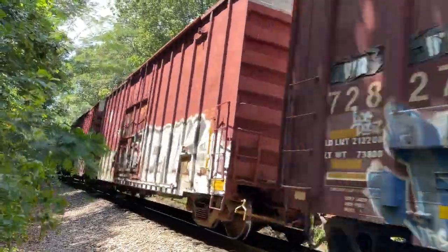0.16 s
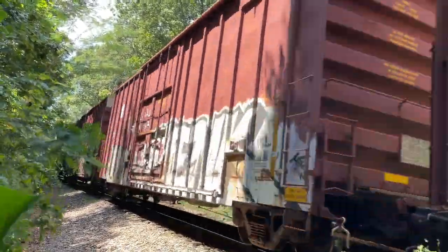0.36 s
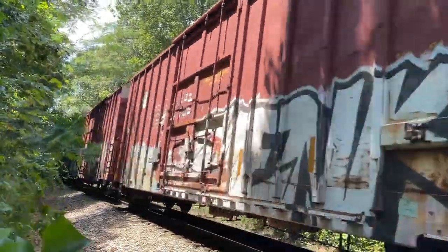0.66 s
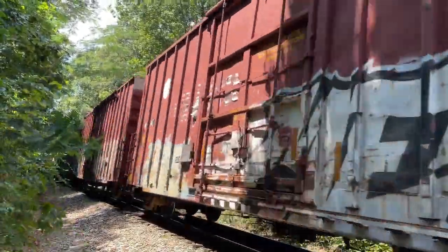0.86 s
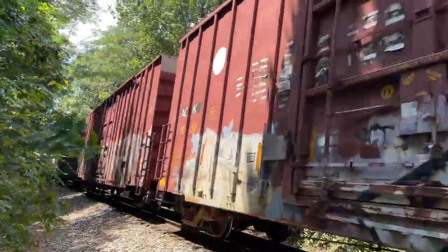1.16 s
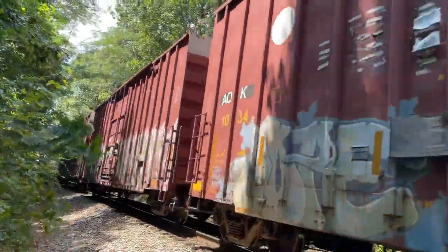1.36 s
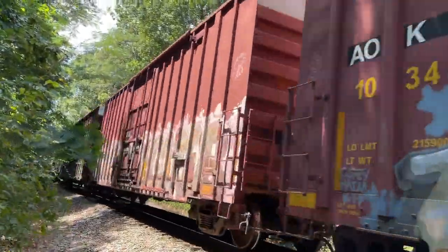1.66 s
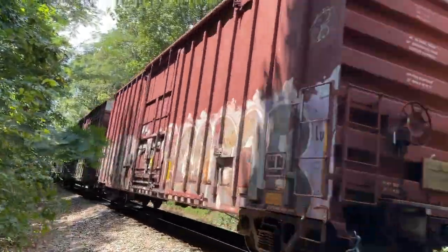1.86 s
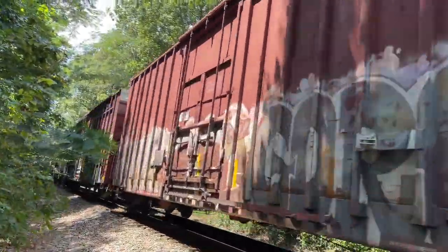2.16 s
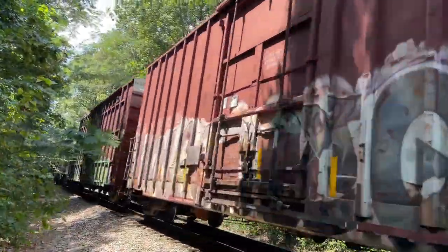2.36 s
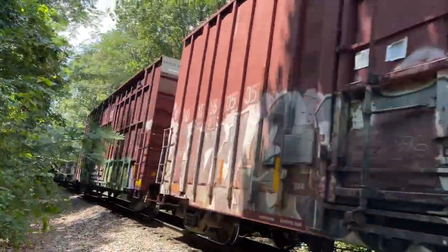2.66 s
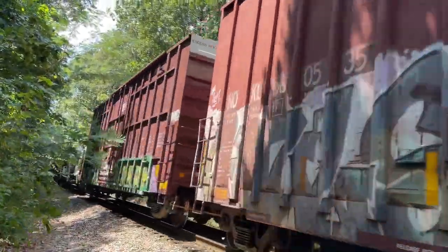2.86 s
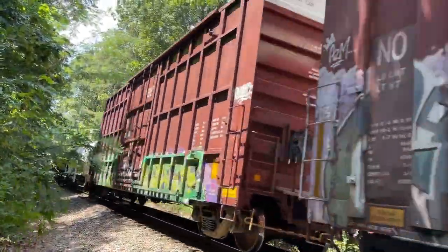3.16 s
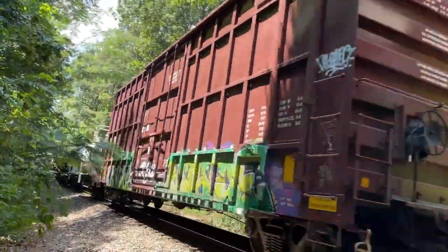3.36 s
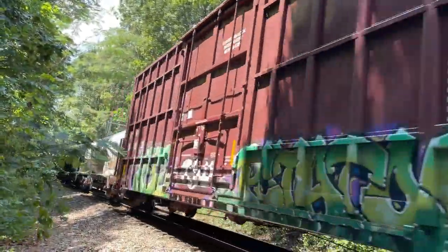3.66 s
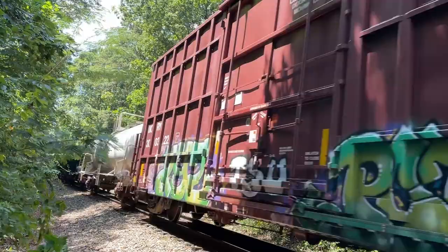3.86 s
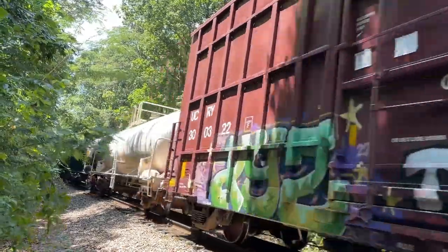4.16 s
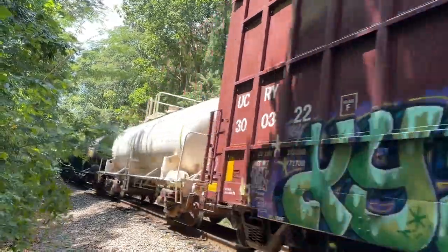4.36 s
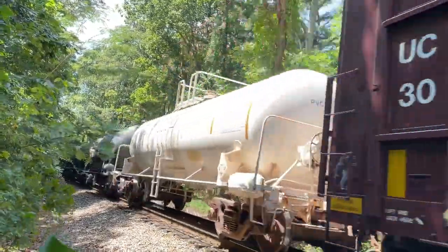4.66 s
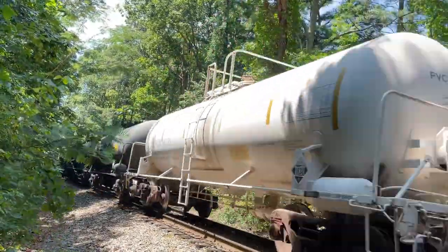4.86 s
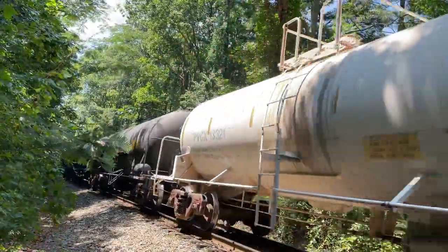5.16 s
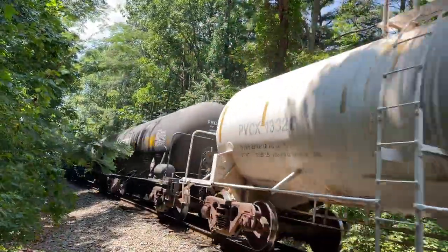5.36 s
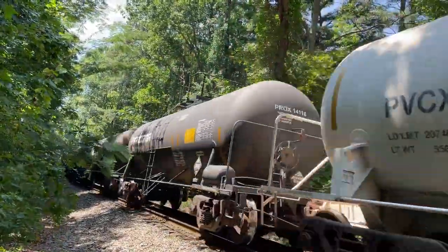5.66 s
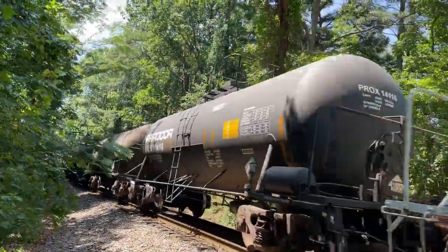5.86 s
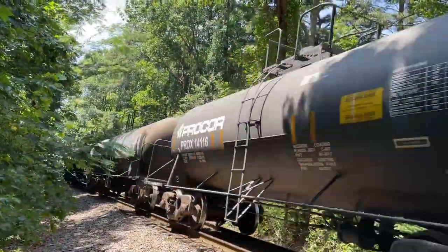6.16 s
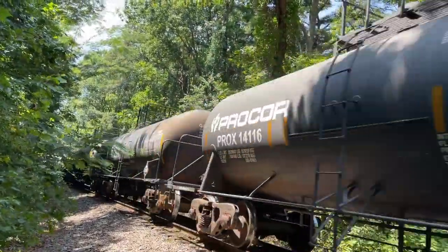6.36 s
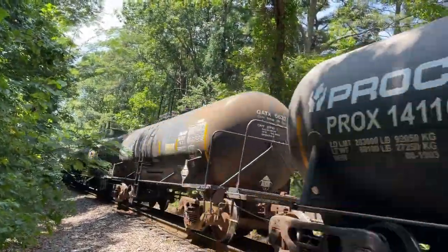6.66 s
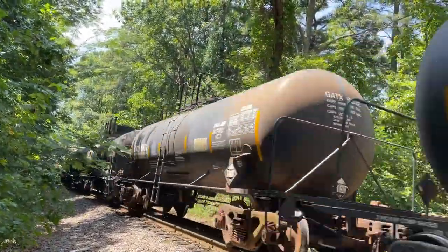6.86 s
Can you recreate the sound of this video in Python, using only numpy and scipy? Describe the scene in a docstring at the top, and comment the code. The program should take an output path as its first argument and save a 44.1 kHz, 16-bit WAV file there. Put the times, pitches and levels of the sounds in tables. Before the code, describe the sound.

A freight train rolls past very close outdoors, heavy low rumble and knocking wheels with faint steel squeaks, thinning as lighter tank cars follow.

```python
"""Freight train rolling past

Boxcars and then tank cars of a freight train roll past a few metres away.
The car bodies rumble as shaped noise; tiny impacts of rough treads make rails roar and wheels ring.
Flanges hiss, squeak and grind on grit; wheels knock over joints, worn ones thump and scrape once a turn.
Couplers clash and loose fittings clink, as noise rung through steel modes or shaped by a spectrum."""
import sys
import numpy as np
from scipy import signal
from scipy.fft import rfft, irfft, next_fast_len
from scipy.io import wavfile
from scipy.ndimage import uniform_filter1d, minimum_filter1d, map_coordinates

SR = 44100
rng = np.random.default_rng(int(sys.argv[2]) if len(sys.argv) > 2 else 0)


def wav_record(signal):
    """Record a signal, one row per channel, as 16-bit PCM in the file named by sys.argv[1]."""
    frames = np.transpose(np.atleast_2d(signal))
    bounded = np.clip(frames, -1, 1)
    # unit amplitude maps onto the largest positive 16-bit level
    quanta = np.round(bounded * 32767).astype(np.int16)
    wavfile.write(sys.argv[1], SR, quanta)


N = 309582

# All level_db columns are relative: the layers add their own trims.
TURNS_PER_S, TURN_START_S = 4.05, 0.391   # wheel rotation

# boom of the car bodies, heavy boxcars first and lighter tank cars last: time_s, level_db
RUMBLE_CURVE = [(0.0, -17), (1.15, -16.5), (1.6, -17.5), (2.15, -16.5), (2.4, -18), (2.7, -22.5),
                (3.25, -19), (3.55, -19.5), (3.72, -23.5), (4.05, -23.5), (4.25, -25.5), (5.3, -26),
                (5.55, -28.5), (7.02, -29)]
# spectrum of the car bodies: freq_hz, level_db (per Hz)
BODY_SPECTRUM = [(20, -36), (30, -15), (40, -9), (52, -0.5), (68, -2.5), (90, -2.5), (120, -8.5),
                 (160, -13.5), (260, -21.5)]


def car_bodies(level_db, evenness=0.69, trim_db=1.0, heave_db=1.2, surge_db=2.0, surge_s=0.405):
    """The heavy cars boom on their springs and surge twice a wheel turn; their mass evens out chance swings."""
    t = np.arange(N) / SR
    surge = np.cos(2 * np.pi * 2 * TURNS_PER_S * (t - surge_s))
    gain = from_db(level_db + trim_db + heave_db * drift(6.7) + surge_db * surge)
    return gain * evened(coloured(noise(), BODY_SPECTRUM), evenness, size=2600)


# car floors heaving on their springs or truck frames droning: centre_s, pitch_hz, level_db, half_length_s
BOOM_EVENTS = [(0.015, 58.7, -14.5, .028), (0.176, 57, -11, 0.024), (0.253, 59, -10, 0.021),
               (0.412, 69, -14, .022), (0.52, 63.5, -14.5, 0.036), (0.591, 168, -18, 0.026),
               (0.755, 157, -17, .025), (0.865, 72, -14.5, 0.05), (1.03, 91.5, -15.5, 0.025),
               (1.042, 195, -18, .02), (1.151, 79, -11.5, 0.039), (1.383, 70, -22, .025),
               (1.70, 160, -13, 0.023), (2.449, 69.6, -17, .03), (3.193, 59, -18.5, .03),
               (3.326, 233, -16, 0.021), (3.262, 72, -17.5, .028), (3.39, 444, -18, .035),
               (3.533, 72, -16, .035), (3.57, 420, -20, .022), (3.607, 492, -16.5, 0.018),
               (4.565, 155, -24, 0.014), (5.736, 78, -22, .035), (5.98, 176, -23, 0.02),
               (6.0, 99.6, -23, 0.037), (6.524, 218, -23, .02), (6.805, 221, -23, .02)]


def booms(trim_db=0.0):
    """A car floor or truck frame swings briefly at one low pitch."""
    out = np.zeros((2, N))
    for s, hz, db, length in BOOM_EVENTS:
        span, age, bell = around(s, length)
        tone = np.sin(2 * np.pi * (hz * age + rng.random((2, 1))))
        out[:, span] += from_db(db + trim_db) * bell * np.sqrt(2) * tone
    return out


# roar of the rail, swelling as each group of wheels comes by: time_s, level_db
ROAR_CURVE = [(0, -20.5), (0.5, -20.5), (1.1, -18.5), (1.45, -21), (1.62, -16.5), (1.9, -16.5),
              (2.12, -18.5), (2.45, -25), (2.95, -22.5), (3.25, -17.5), (3.3, -14), (3.61, -13.5),
              (3.72, -25), (3.82, -21), (4.3, -27), (4.58, -23.5), (5.5, -25.5), (5.88, -24), (6.05, -22.5),
              (6.2, -25.5), (6.6, -25), (7.02, -27)]
# spectrum of the roaring rail: freq_hz, level_db (per Hz)
RAIL_SPECTRUM = [(200, -42), (310, -5), (400, -1), (520, -1.5), (700, -7.5), (950, -12), (1250, -20),
                 (1700, -25.5), (3000, -50)]
# spectrum of the drumming sleepers: freq_hz, level_db (per Hz)
SLEEPER_SPECTRUM = [(80, -13), (125, -3), (170, 0), (250, -2), (310, -4.5), (450, -15)]


def track(sleeper_db, rail_db, turn, jolt_db=1.06, turn_db=1.0, evenness=0.99, clank_db=-4):
    """Rough treads hammer the track with dense small jolts: sleepers drum, rails roar, frames clank."""
    drum = evened(coloured(grains(per_s=4000, spread_db=2), SLEEPER_SPECTRUM), evenness, size=4000)
    clank = from_db(clank_db) * rms_one(frames(rng.random(N) < 45 / SR))
    rail = coloured(grains(per_s=7000, spread_db=1.5), RAIL_SPECTRUM)
    roar = evened(rail + clank, evenness, size=3000)
    roar_gain = from_db(rail_db + jolt_db * drift(34) + turn_db * turn)
    return from_db(sleeper_db) * drum + roar_gain * roar


def rail_span(level_db, hz=1250, width_hz=650, share_db=-17, loud_db=-17, growth=0.73):
    """The rail rings between its sleepers, out of proportion under the heaviest wheels."""
    ring = rms_one(double_resonance(grains(per_s=6000, spread_db=2.5), hz, width_hz))
    return from_db(level_db + share_db + growth * np.maximum(level_db - loud_db, 0)) * ring


# modes of the truck frames and car floors: freq_hz, width_hz, level_db
FRAME_MODES = [(165, 51, -6.5), (208.4, 17, -8.5), (284.6, 14.2, 0), (366, 22.5, 3), (416.3, 12, -4),
               (478.4, 29, -0.5), (553.5, 28, 1.5), (660, 18.7, -3.5), (972, 42, -5), (1162, 41, -13)]


def frames(jolts, contact_hz=1100):
    """Steel frames ring; every jolt, softened by the springs, reaches each mode with its own strength."""
    ring = sum(from_db(db) * resonance(jolts * noise(), hz, width) for hz, width, db in FRAME_MODES)
    return signal.sosfilt(signal.butter(4, contact_hz, fs=SR, output="sos"), ring)


def frame_rattle(roar_db, share_db=-7, loud_db=-15, growth=0.8, per_s=220):
    """Under the roughest treads the truck frames rattle, out of proportion to the roar."""
    rattle = evened(rms_one(frames(rng.random(N) < per_s / SR)), 0.45, size=2000)
    return from_db(roar_db + share_db + growth * np.minimum(roar_db - loud_db, 3)) * rattle


# steely wash of all the wheels: freq_hz, level_db (per Hz)
WHEEL_SPECTRUM = [(800, 2), (1200, -10), (1500, 1.5), (2100, 4), (2700, 2), (3100, -2.5), (3700, -13),
                  (5000, -3.5), (8000, -58)]


def wheels(level_db, wash_db=-4.0, judder_db=0.7, chirp_db=-9):
    """The nearest wheels ring out of a steely wash and the chirping of all the others."""
    wash = coloured(grains(per_s=9000, spread_db=1.5), WHEEL_SPECTRUM)
    wash = wash * from_db(wash_db + judder_db * drift(32))
    return from_db(level_db) * (wheel_ring() + wash + from_db(chirp_db) * chirps(1501, 2850, count=520))


SPEED_M_S, TRACK_M, SOUND_M_S = 12, 4, 343   # train speed, distance to the track, speed of sound
# groups of wheels at the car ends: nearest_s, pitch_factor, ring_db
WHEEL_PASSES = [(0.45, 1.0, 0), (2.2, 1.01, -1), (3.45, .995, -5), (4.6, .99, -10.5), (6.1, 1.01, -6.5),
                (7.3, .99, -4.5)]
# ringing modes of a wheel: freq_hz, width_hz, level_db
WHEEL_MODES = [(1618, 57, 2), (1880, 24, 3), (2162, 40, -4), (2508, 78, 3), (2775, 65, -2),
               (3264, 65, -7.5), (3290, 65, -8), (4057, 90, -2.5), (4810, 69, -4.5), (5570, 110, -34)]


def wheel_ring(wander_db=3.5):
    """Wheel discs ring on the rough rail; each group swells, falls in pitch as it passes, and fades."""
    t, out = np.arange(N) / SR, 0
    for s, pitch, ring_db in WHEEL_PASSES:
        contact, ring = noise(), 0
        for hz, width, db in WHEEL_MODES:
            mode = rms_one(resonance(contact, hz * pitch, width))
            ring = ring + from_db(db + wander_db * drift(7.0)) * mode
        distance = np.hypot(TRACK_M, SPEED_M_S * (t - s))
        left_wheel = t - distance / SOUND_M_S   # travel time bends the pitch
        heard = np.array([np.interp(left_wheel, t, path, left=0) for path in rms_one(ring)])
        out = out + from_db(ring_db) * heard * TRACK_M / distance
    return out


# how hard the flanges rub: time_s, hiss_db
HISS_CURVE = [(0.0, -41), (0.42, -35), (0.7, -38.5), (1.45, -37), (1.93, -30.5), (2.25, -36.5),
              (2.38, -34.5), (2.7, -41.5), (3.0, -40.5), (3.1, -36.5), (3.47, -34.5), (3.56, -32.5),
              (3.72, -37.5), (3.87, -34.5), (4.05, -44.5), (4.35, -45.5), (4.7, -41), (5.4, -42.5),
              (6.05, -35), (6.33, -36.5), (6.45, -38.5), (7.02, -41.5)]
# how much fine grit sizzles under the flanges: time_s, level_db (relative to their hiss)
SIZZLE_CURVE = [(0, -5), (0.65, -7.5), (1.35, -4), (3.6, -11), (4.3, -6), (5.3, -10), (6.2, -2.5),
                (7.02, -6.5)]
# spectrum of the flange hiss: freq_hz, level_db (per Hz)
FLANGE_SPECTRUM = [(2000, -24), (3200, 5), (4200, 2), (5200, -0.5), (6500, -1.5), (8200, -11.5),
                   (10000, -7.5), (13000, -50)]
# spectrum of the crushed grit: freq_hz, level_db (per Hz)
GRIT_SPECTRUM = [(7000, 7), (8500, -3), (10000, -3), (12000, -0.5), (13500, -11.5), (15500, -3.5),
                 (16500, -20)]


def flanges(level_db, sizzle_db, turn, flutter_db=1.43, turn_db=1.27, grit_db=-5, chirp_db=-13):
    """Steel sliding on steel hisses, chirps faintly and crushes grit."""
    rub = coloured(noise(), FLANGE_SPECTRUM) + from_db(chirp_db) * chirps(3800, 6800, count=500)
    crushing = noise() + from_db(grit_db) * grains(per_s=3300, spread_db=-8.0)
    sizzle = from_db(sizzle_db) * coloured(crushing, GRIT_SPECTRUM)
    gain = from_db(level_db + flutter_db * drift(15) + turn_db * turn)
    return gain * rms_one(rms_one(rub) + sizzle)


# wheels knocking over joints: start_s, level_db, pitch_factor
JOINT_KNOCKS = [(0.066, -8, 1), (0.156, 1.5, 1), (0.166, 4.5, 0.64), (0.368, -4, 0.67), (0.399, -2, 1.01),
                (0.588, 1, 0.83), (0.655, -2, .7), (1.037, -6, 0.47), (1.119, -1, 0.8), (1.307, -7, 1.08),
                (1.673, -4, 0.78), (1.818, -0.5, 0.94), (1.862, -1, 0.91), (1.966, -5, 0.83),
                (2.021, -2, 1.08), (2.265, -3.5, 0.86), (2.293, -4, .76), (3.044, -2, 0.9),
                (3.104, -3.5, 1), (3.287, 0, 0.65), (3.323, -2, 0.57), (3.347, -1, 0.93), (3.376, -2, 0.76),
                (3.43, -2.5, 0.83), (3.506, -1, 0.88), (3.535, 2.5, .9), (3.556, 1, .72), (3.603, -2, .9),
                (4.031, -7, 0.8), (4.505, -3.5, 0.73), (4.953, -7, 0.81), (5.721, -4.5, 0.94),
                (5.975, -2.5, 0.58), (6.002, -5, .6), (6.054, -6, 1), (6.072, -7, 0.76),
                (6.368, -5.5, 0.35), (6.51, -2.5, 0.56), (6.528, -8.5, 0.66), (6.739, -13, 1.13)]
# spectrum of the dull burst: freq_hz, level_db (per Hz), at pitch factor 1
KNOCK_SPECTRUM = [(40, -26), (90, -3), (200, 0), (400, -3), (560, 10.5), (800, 0.5), (1400, -18.5),
                  (3000, -24), (8000, -48)]


def knocks(strike_db=-12, rise_s=0.0015, t60_s=0.16, ring_db=-25):
    """A wheel drops at a joint: the axle punches, a burst follows at the wheel's pitch, the frames ring on."""
    out, jolts, after = np.zeros((2, N)), np.zeros(N), np.arange(SR // 4)
    burst = evened(coloured(noise(), KNOCK_SPECTRUM), 1.0, size=700)
    fall = blow(0, rise_s, t60_s)[after]
    for s, db, pitch in JOINT_KNOCKS:
        start = round(s * SR)
        # reading the burst slower makes it deeper
        thud = np.array([map_coordinates(path, [start + pitch * after], order=1) for path in burst])
        hit = from_db(strike_db) * fall * thud + punch(after / SR, pitch)
        out[:, start:start + len(after)] += from_db(db) * hit[:, :N - start]
        jolts[start] = from_db(db + ring_db)
    return out + frames(jolts)


# modes of a struck axle and its wheels: freq_hz (at pitch factor 1), width_hz, level_db
AXLE_MODES = [(217, 80, -8.5), (530, 100, -4), (1150, 300, -9)]


def punch(age, pitch, contact_s=0.0024):
    """The struck axle swings for a few cycles in each of its modes."""
    swing = 0
    for hz, width, db in AXLE_MODES:
        tone = np.sin(2 * np.pi * (hz * pitch * age + rng.random((2, 1))))
        swing = swing + from_db(db) * np.exp(-np.pi * width * age) * tone
    return (1 - np.exp(-age / contact_s)) * swing


# half length of a touch; the thump comes before the rasp; time to fade with distance
TOUCH_S, THUMP_LEAD_S, EARSHOT_S = 0.1, 0.03, 0.64
# wheels with a worn patch: nearest_s, turn_s, thump_db, roar_db, rasp_db, ring_db
WORN_WHEELS = [(0.645, 0.24, -25, -20.5, -38, -36), (2.29, 0.25, -29, -24.5, -45, -44),
               (3.11, 0.24, -37, -31, -34, -35), (4.334, 0.243, -30, -22, -43, -46),
               (6.55, 0.25, -25.5, -28, -33.5, -33)]


def worn_patches(count=4):
    """A worn patch meets the rail once a turn, fainter when far: strengths of thump, roar, rasp and ring."""
    thump, rest = 0, 0
    for nearest_s, turn_s, thump_db, *levels_db in WORN_WHEELS:
        since_s = np.arange(-count, count + 1) * turn_s
        near = 1 / (1 + (since_s / EARSHOT_S) ** 4)
        touches = sum(size * swell(nearest_s + s, TOUCH_S) for s, size in zip(since_s, near))
        early = np.interp(np.arange(N) + THUMP_LEAD_S * SR, np.arange(N), touches)
        thump = thump + from_db(thump_db) * early
        rest = rest + from_db(levels_db)[:, None] * touches
    return thump, *rest


def axle_thumps(force, hz=101, width_hz=130):
    """A worn patch shakes the axle on its springs: a short low thud."""
    shake = double_resonance(noise(), hz, width_hz)
    return force * evened(rms_one(shake), 0.65, size=1500)


# spectrum of a worn patch on the rail: freq_hz, level_db (per Hz)
WORN_SPECTRUM = [(250, -7), (450, 1), (700, -5), (1000, -7.5), (1400, -18.5), (1800, -19), (2400, -21.5),
                 (3200, -40.5)]


def worn_growl(force, trim_db=-0.5):
    """A worn patch hammers the rail in a short coarse growl."""
    growl = evened(coloured(grains(per_s=5000, spread_db=1.5), WORN_SPECTRUM), 1.0, size=1500)
    return from_db(trim_db) * force * growl


# a tread slips and grinds: centre_s, level_db, half_length_s
TREAD_SCRAPES = [(1.94, -21.5, 0.056), (3.13, -26, 0.049), (3.3, -34, .04), (3.383, -22, 0.06),
                 (3.535, -19, 0.041), (6.07, -30, .035), (6.553, -40, 0.044)]
# spectrum of a scrape: freq_hz, level_db (per Hz)
SCRAPE_SPECTRUM = [(500, -3), (1000, 20), (1800, 9), (2600, 5), (3600, 0), (6000, -8.5), (12000, -55)]


def scrapes(worn_rasp, trim_db=-4.5):
    """Short swelling rasps of stick and slip."""
    pressure = worn_rasp + sum(from_db(db) * swell(s, length) for s, db, length in TREAD_SCRAPES)
    return from_db(trim_db) * pressure * coloured(grains(per_s=2500, spread_db=3.0), SCRAPE_SPECTRUM)


# a flange grinds along the rail head: centre_s, pitch_hz, level_db, half_length_s
FLANGE_GRINDS = [(0.65, 1690, -36, .03), (1.7, 780, -28, .03), (1.82, 890, -26, .025),
                 (1.94, 2400, -32, .04), (2.05, 2430, -38, .05), (2.55, 1950, -38, .06),
                 (3.12, 1920, -38, 0.05), (3.36, 1070, -33, .06), (3.4, 1500, -34, 0.055),
                 (3.57, 1000, -27, .05), (4.08, 1840, -39, .06), (4.09, 2300, -42, 0.064),
                 (4.295, 1880, -36, 0.064), (4.35, 2300, -43, 0.072), (4.577, 1900, -45, .06),
                 (5.363, 2190, -39, .035), (5.823, 2550, -35.5, .03), (6.008, 900, -26, .03),
                 (6.065, 1520, -33, .035), (6.544, 2300, -37, .055), (6.8, 1550, -32, .05)]


def grinds(trim_db=0.0, width_hz=240):
    """Dense stick and slip of a flange, sounding through one broad resonance of its wheel."""
    out, slips = np.zeros((2, N)), grains(per_s=1200, spread_db=2.5)
    for s, hz, db, length in FLANGE_GRINDS:
        span, _, bell = around(s, length)
        band = signal.butter(2, [hz - width_hz / 2, hz + width_hz / 2], "band", fs=SR, output="sos")
        out[:, span] += from_db(db + trim_db) * bell * rms_one(signal.sosfilt(band, slips[:, span]))
    return out


# a slipping wheel sings in one mode: centre_s, pitch_hz, level_db, half_length_s, waver_hz, sink_hz_per_s
WHEEL_SQUEAKS = [(0.05, 1880, -38.5, .04, 12, 0), (0.125, 1860, -36, .035, 12, 4),
                 (0.178, 1640, -32, .02, 26, 0), (0.33, 3330, -43, .06, 22, 300),
                 (0.41, 3290, -42, .055, 50, 497), (0.43, 2725, -36, .065, 28, 600),
                 (0.44, 1875, -37, .035, 12, 0), (0.44, 4000, -45, .04, 35, 0),
                 (0.6, 2600, -42, .09, 26, 897), (0.6, 2770, -45, .08, 30, 403),
                 (0.61, 3290, -40, 0.035, 28, 0), (0.58, 2180, -40, 0.07, 16, 200),
                 (0.72, 4030, -45, .06, 30, 0), (1.1, 4020, -50, .14, 12, 0),
                 (2.04, 2570, -39.5, 0.056, 38, 200), (2.19, 1950, -36, .055, 15, 200),
                 (2.33, 3330, -40.5, .05, 25, 400), (2.45, 3440, -41, .05, 10, 400),
                 (2.48, 3305, -38, .055, 9, 800), (2.44, 4230, -42.5, .05, 14, 400),
                 (2.45, 2600, -37, .035, 18, 200), (3.07, 1895, -37, .028, 22, 0),
                 (3.2, 1900, -38.5, .08, 22, 150), (3.385, 1870, -29, 0.045, 10, 200),
                 (3.654, 3390, -41.5, .09, 24, 300), (6.92, 3400, -44.5, .06, 18, 300)]


def squeaks(slips, trim_db=2.5, rasp_db=4.5):
    """Each squeak swells and dies, rasping and wavering in its own way, most sinking as the wheel moves on."""
    out, waver = np.zeros((2, N)), drift(106)
    rasp = rms_one(from_db(rasp_db * np.clip(drift(54), -2, 2)))
    for s, hz, db, length, waver_hz, sink_hz_per_s in slips:
        span, age, bell = around(s, length)
        own = (span + rng.integers(N)) % N   # a stretch of waver and rasp of its own
        pitch_hz = hz - sink_hz_per_s * age + waver_hz * waver[own]
        phase = 2 * np.pi * (np.cumsum(pitch_hz) / SR + rng.random((2, 1)))
        out[:, span] += from_db(db + trim_db) * bell * rasp[own] * np.sqrt(2) * np.sin(phase)
    return out


def stray_squeaks(hiss_db, per_s=7, low_hz=2287, high_hz=5530, below_hiss_db=-11):
    """Faint squeaks at random moments and pitches, louder the harder the flanges rub."""
    length_s, waver_hz, sink_hz_per_s = 0.05, 17, 286
    slips = []
    for when, pitch in rng.random((int(per_s * N / SR), 2)):
        hz = low_hz * (high_hz / low_hz) ** pitch
        level_db = hiss_db[int(when * N)] + below_hiss_db
        slips.append((when * N / SR, hz, level_db, length_s, waver_hz, sink_hz_per_s))
    return slips


def chirps(low_hz, high_hz, count, length_s=0.02):
    """A swarm of tiny overlapping squeaks, each at a pitch of its own; rms 1."""
    out, age = np.zeros((2, N + SR // 5)), np.arange(SR // 5) / SR - 1 / 10
    for when, pitch, size, *phase in rng.random((count, 5)):
        hz, start = low_hz * (high_hz / low_hz) ** pitch, int(when * N)
        tone = np.sin(2 * np.pi * (hz * age + np.array(phase)[:, None]))
        out[:, start:start + len(age)] += size * np.exp(-(age / length_s) ** 2) * tone
    return rms_one(out[:, SR // 10:SR // 10 + N])


# couplers and brake rods clash: start_s, level_db, t60_s
COUPLER_CLASHES = [(0.514, -26, 0.22), (2.335, -31, .35), (2.803, -29, 0.11), (3.525, -28, 0.27),
                   (6.288, -24.5, 0.47)]
# modes of the couplers and brake rods: freq_hz, width_hz, level_db
COUPLER_MODES = [(1150, 110, -1), (1530, 130, -1), (2400, 120, 1), (3040, 99, 2.5), (3600, 200, -1),
                 (4150, 150, -14), (5080, 170, 3.5), (5700, 300, -6), (6600, 400, -1)]


def clashes(trim_db=0.0, rise_s=0.0031):
    """Heavy steel parts meet and chatter out, ringing in the coupler's modes."""
    chatter = grains(per_s=2500, spread_db=1)
    modes = [from_db(db) * rms_one(resonance(chatter, hz, width)) for hz, width, db in COUPLER_MODES]
    force = sum(from_db(db + trim_db) * blow(s, rise_s, t60) for s, db, t60 in COUPLER_CLASHES)
    return force * rms_one(sum(modes))


# loose fittings clinking: start_s, level_db, t60_s
FITTING_CLINKS = [(0.152, -18, 0.016), (0.516, -29, 0.16), (1.945, -27, 0.19), (2.33, -34, .2),
                  (2.803, -34.5, .08), (6.067, -29, .08), (6.158, -26, .04), (6.203, -26, .045),
                  (6.29, -33.5, 0.36)]
# spectrum of a clink: freq_hz, level_db (per Hz)
CLINK_SPECTRUM = [(1500, -18), (3000, -7), (5000, 6), (8000, 4), (11000, -4), (15500, -11)]


def clinks(rise_s=0.00071):
    """Light steel parts touch and rattle out."""
    force = sum(from_db(db) * blow(s, rise_s, t60) for s, db, t60 in FITTING_CLINKS)
    return force * coloured(noise(), CLINK_SPECTRUM)


def tank_shells(hz=1150, width_hz=320, nearest_s=5.74, nearest_db=-34.5, fade_db_per_s=11):
    """The thin round shells of the tank cars ring hollowly, drawing near and moving off."""
    level_db = nearest_db - fade_db_per_s * np.abs(np.arange(N) / SR - nearest_s)
    return from_db(level_db) * rms_one(double_resonance(noise(), hz, width_hz))


# likeness of the two ports: freq_hz, likeness (0-1)
PORT_LIKENESS = [(30, .99), (70, .97), (150, .92), (300, .84), (600, .74), (1000, .55), (1900, .33),
                 (2800, .5), (5000, .6), (6800, .73), (8200, .99), (9800, .72), (11500, .99), (13000, .55),
                 (15000, .99)]
# phase lead of the left port: freq_hz, lead_rad
LEFT_LEAD = [(0, 0.0), (150, -0.22), (350, -0.76), (650, -1.43), (1200, -1.65), (1650, -2.06), (2000, 0.22),
             (2500, 0.23), (4200, -0.12), (5000, 0.77), (6500, -1.03), (7500, -2.39), (8200, -3.14),
             (9000, -3.87), (10200, -5.19), (10800, -6.11), (12200, -6.31), (13000, -7.25), (14000, -9.2),
             (16000, -9.76)]
# left minus right: freq_hz, balance_db
PORT_BALANCE = [(60, -.3), (160, -.2), (270, -1.8), (450, -3.2), (740, -3.8), (1200, -1.8), (2000, 1),
                (3300, 2.2), (5500, 2.6), (8000, 0), (15000, 0)]


def microphone_pair(sound):
    """Straight sound reaches both ports with a phase shift; scattered sound sets them apart."""
    size = next_fast_len(N + 2000)
    hz = np.arange(size // 2 + 1) * SR / size
    straight, scattered = rfft(sound, size)
    alike, sides = np.clip(at_hz(PORT_LIKENESS, hz), 0, 1), np.array([[1], [-1]])
    ports = np.sqrt((1 + alike) / 2) * straight + sides * np.sqrt((1 - alike) / 2) * scattered
    ports[0] *= np.exp(1j * np.interp(hz, *np.transpose(LEFT_LEAD)))
    return irfft(ports * from_db(sides * at_hz(PORT_BALANCE, hz) / 2), size)[:, :N]


def from_one_side(sound, lag_s, shade_db, scatter_db=-9):
    """A source to the right reaches the left port later and weaker, with a little scattered sound."""
    straight, scattered = sound
    late = map_coordinates(straight, [np.arange(N) - lag_s * SR], order=1)
    scattered = from_db(scatter_db) * scattered
    ports = np.array([late + scattered, straight - scattered])
    return ports * from_db(np.array([[-1], [1]]) * shade_db / 2)


def from_db(db):
    """Decibels to gain."""
    return 10 ** (np.asarray(db) / 20)


def joined_db(level_db, strength):
    """Level of a steady sound and an unrelated swell together."""
    return 10 * np.log10(from_db(level_db) ** 2 + strength ** 2)


def rms_one(x):
    """Scale to unit rms."""
    return x / np.sqrt(np.mean(x ** 2) + 1e-20)


def in_time(curve):
    """A level curve at every sample."""
    return np.interp(np.arange(N) / SR, *np.transpose(curve))


def at_hz(points, hz):
    """Read a table on a log-frequency axis."""
    known_hz, values = np.transpose(points)
    return np.interp(np.log(hz + 1), np.log(known_hz), values)


def drift(rate_hz):
    """Slow chance of spread 1, drawn every 40 samples and joined by straight lines."""
    r = np.exp(-80 * np.pi * rate_hz / SR)
    slow = signal.lfilter([1], [1, -2 * r, r * r], rng.standard_normal(N // 40 + 2002))[2000:]
    return np.interp(np.arange(N) / 40, np.arange(len(slow)), rms_one(slow))


def noise():
    """Two unrelated noises: the sound that comes straight, and that scattered by ground and cars."""
    return rng.standard_normal((2, N))


def grains(per_s, spread_db):
    """Tiny impacts of uneven size at random moments; rms 1."""
    born = rng.random(N) < per_s / SR
    size = from_db(spread_db * np.minimum(rng.exponential(1, N), 4))
    return rms_one(born * size * noise())


def coloured(x, spectrum):
    """Give a steady excitation a spectrum that falls away beyond its ends; rms 1."""
    size = next_fast_len(N)
    hz = np.arange(size // 2 + 1) * SR / size + 1
    skirts = np.minimum(1, np.minimum(hz / spectrum[0][0], spectrum[-1][0] / hz)) ** 2
    return rms_one(irfft(rfft(x, size) * from_db(at_hz(spectrum, hz)) * skirts, size)[:, :N])


def evened(x, evenness, size):
    """Smooth the chance swells of a noise over `size` samples; rms 1."""
    power = uniform_filter1d(x ** 2, size=size) + 1e-4
    return rms_one(x / power ** (np.clip(evenness, 0, 1) / 2))


def resonance(x, hz, width_hz):
    """A two-pole resonance."""
    r = np.exp(-np.pi * width_hz / SR)
    whisper = 1e-18 * (np.arange(N) % 3)   # inaudible, keeps the filter from vanishingly small numbers
    return signal.lfilter([1, 0, -1], [1, -2 * r * np.cos(2 * np.pi * hz / SR), r * r], x + whisper)


def double_resonance(x, hz, width_hz):
    """The same resonance twice in a row, for steeper sides."""
    return resonance(resonance(x, hz, width_hz), hz, width_hz)


def blow(s, rise_s, t60):
    """Envelope of a blow: a quick rise, then an exponential fall."""
    age = np.maximum(np.arange(N) / SR - s, 0)
    return (1 - np.exp(-age / rise_s)) * from_db(-60 * np.minimum(age / t60, 2))


def swell(s, length_s):
    """A smooth rise and fall around one moment."""
    return np.exp(-2 * np.minimum(((np.arange(N) / SR - s) / length_s) ** 2, 20))


def around(s, length_s):
    """The samples near one moment, their time from it, and a bell-shaped swell over them."""
    first = max(0, int((s - 2.5 * length_s) * SR))
    span = np.arange(first, min(N, int((s + 2.5 * length_s) * SR)))
    age = span / SR - s
    return span, age, np.exp(-(age / length_s) ** 2)


# sleepers drum with the weight of the cars and tread roughness: average dB, then dB per dB of each
DRUM_DB, DRUM_PER_RUMBLE, DRUM_PER_ROAR = -22, 0.34, 0.14
# wheels ring with tread roughness and flange rub: likewise
RING_DB, RING_PER_ROAR, RING_PER_HISS = -33, 0.29, 0.31


def scene(rail_db=0.0, span_db=-2.5, flange_db=0.95):
    """Weight, roughness and rub drive the rolling; out-of-round wheels sway its roar and hiss once a turn."""
    curves = (RUMBLE_CURVE, ROAR_CURVE, HISS_CURVE, SIZZLE_CURVE)
    rumble, roar, hiss, sizzle = (in_time(curve) for curve in curves)
    weight, rough, rub = rumble - rumble.mean(), roar - roar.mean(), hiss - hiss.mean()
    drum = DRUM_DB + DRUM_PER_RUMBLE * weight + DRUM_PER_ROAR * rough
    ring = RING_DB + RING_PER_ROAR * rough + RING_PER_HISS * rub
    thump, worn_roar, worn_rasp, worn_ring = worn_patches()
    turn = np.cos(2 * np.pi * TURNS_PER_S * (np.arange(N) / SR - TURN_START_S))

    cars = car_bodies(rumble) + booms() + axle_thumps(thump) + tank_shells()
    rails = track(drum, roar + rail_db, turn)
    steel = wheels(joined_db(ring, worn_ring)) + flanges(hiss + flange_db, sizzle, turn)
    steel = steel + squeaks(WHEEL_SQUEAKS + stray_squeaks(hiss))
    ahead = microphone_pair(cars + rails + steel + knocks() + clashes() + clinks())
    # wheels right in front
    abreast = rail_span(roar + span_db) + frame_rattle(roar) + scrapes(worn_rasp)
    abreast = from_one_side(abreast, lag_s=0.00016, shade_db=2)
    # wheels that have gone by to the right
    passed = from_one_side(worn_growl(worn_roar) + grinds(), lag_s=0.0004, shade_db=3.5)
    return ahead + abreast + passed


def record(dry, ceiling=0.93, cutoff_hz=16000):
    """A quick limiter holds down the highest peaks, and the top is cut."""
    allowed = np.minimum(1, ceiling / (np.abs(dry).max(axis=0) + 1e-9))
    gain = uniform_filter1d(minimum_filter1d(allowed, size=300), size=300)
    return signal.sosfilt(signal.ellip(10, 0.1, 80, cutoff_hz, fs=SR, output="sos"), dry * gain)


dry = scene()
out = record(dry)
wav_record(out)
```